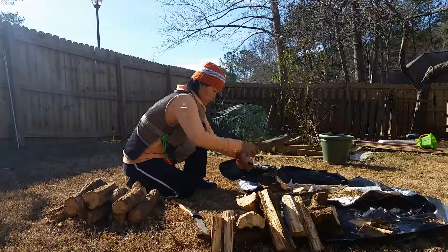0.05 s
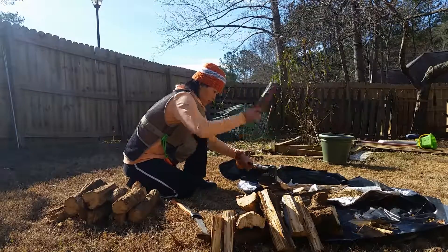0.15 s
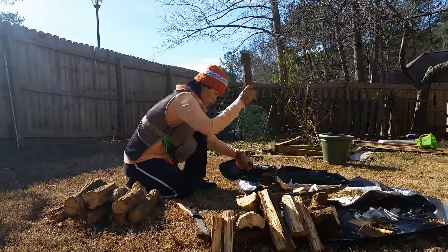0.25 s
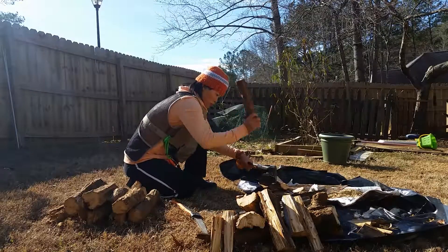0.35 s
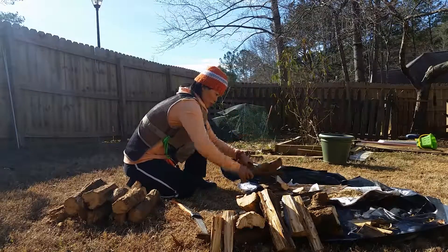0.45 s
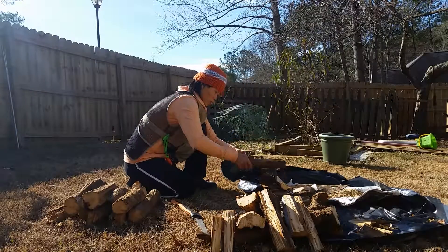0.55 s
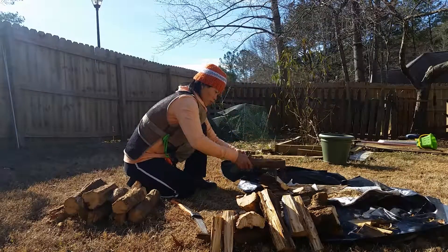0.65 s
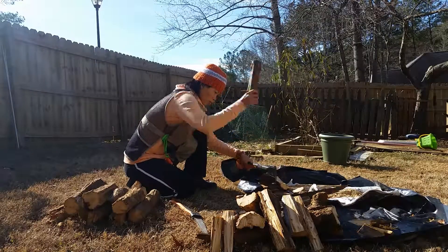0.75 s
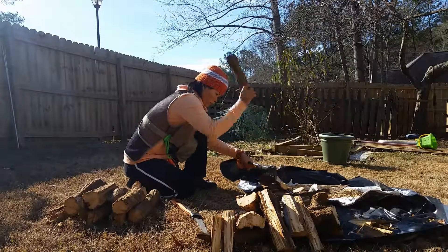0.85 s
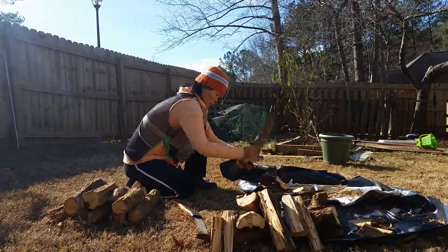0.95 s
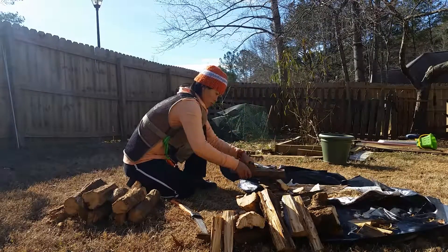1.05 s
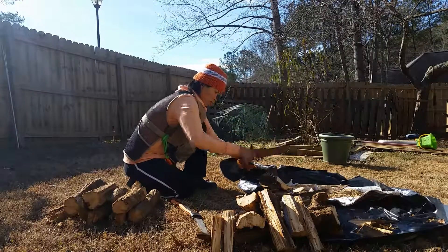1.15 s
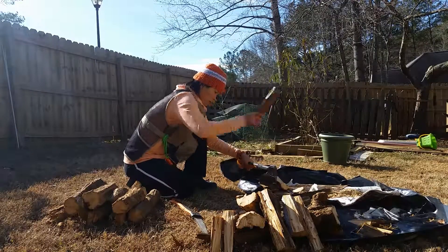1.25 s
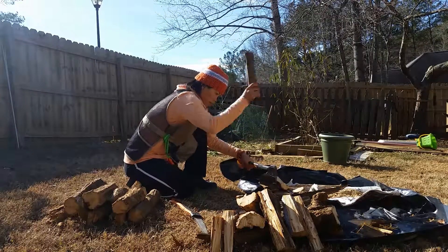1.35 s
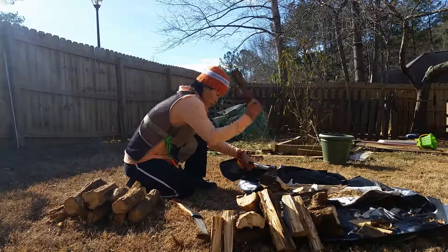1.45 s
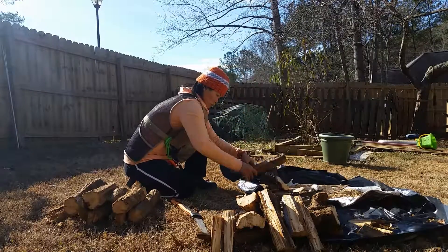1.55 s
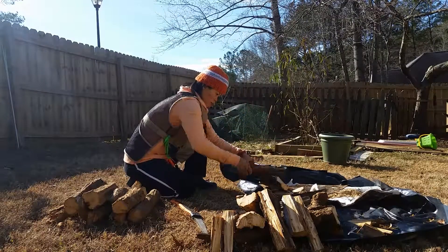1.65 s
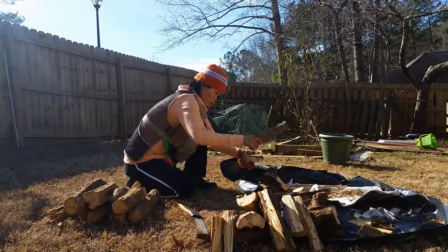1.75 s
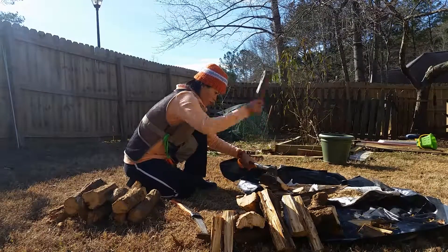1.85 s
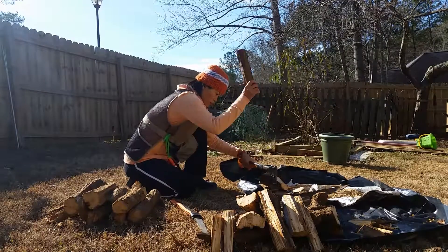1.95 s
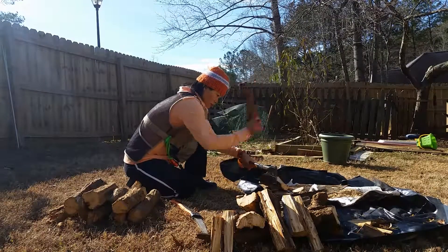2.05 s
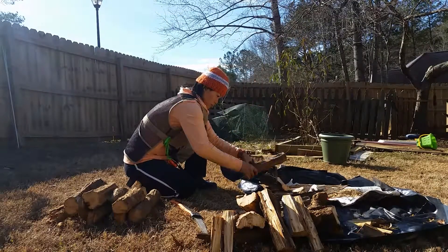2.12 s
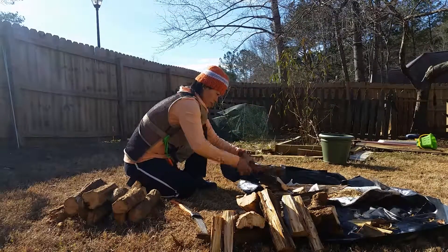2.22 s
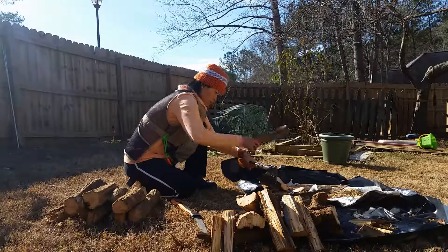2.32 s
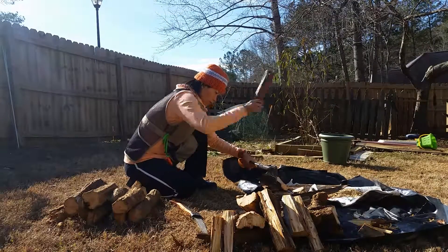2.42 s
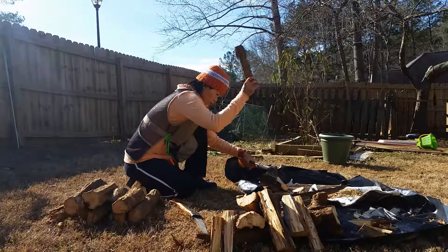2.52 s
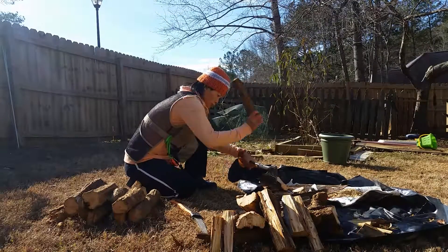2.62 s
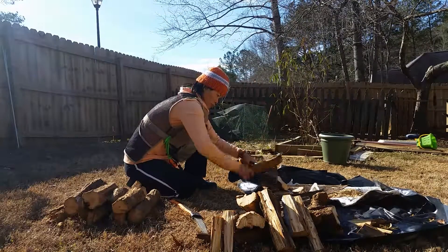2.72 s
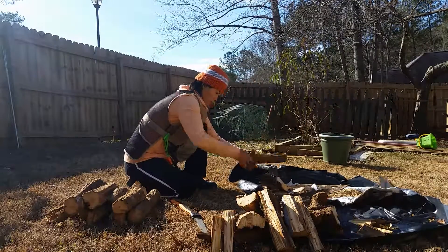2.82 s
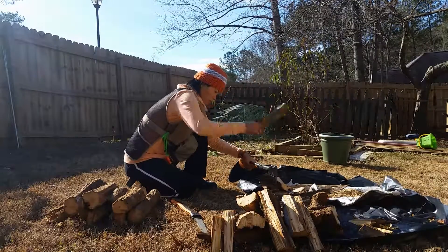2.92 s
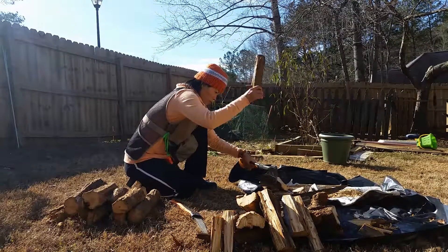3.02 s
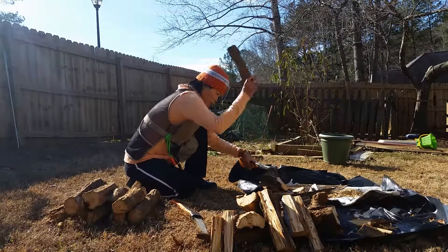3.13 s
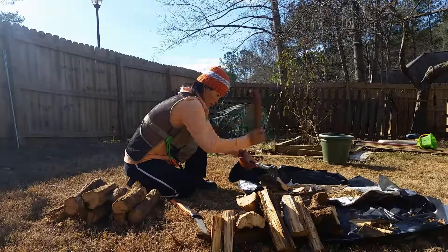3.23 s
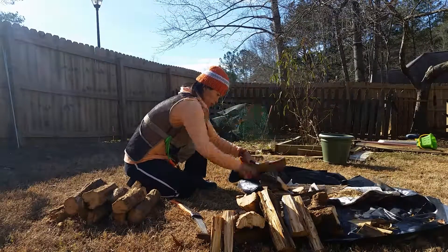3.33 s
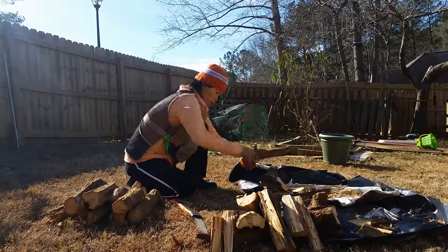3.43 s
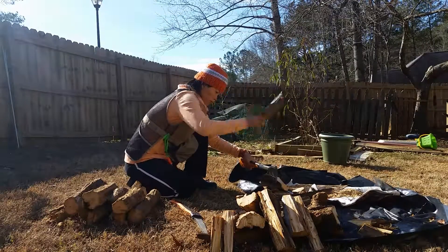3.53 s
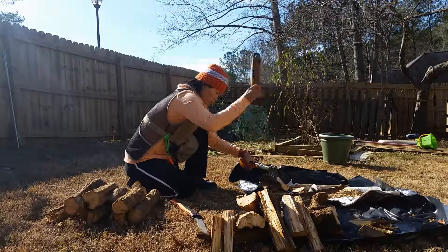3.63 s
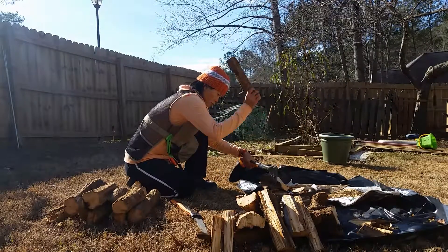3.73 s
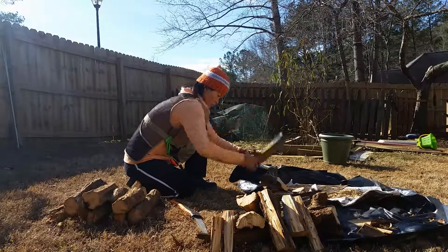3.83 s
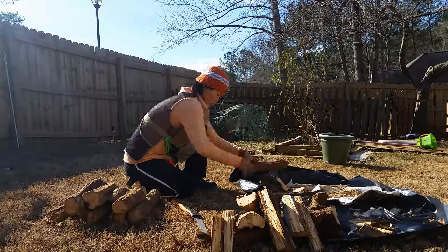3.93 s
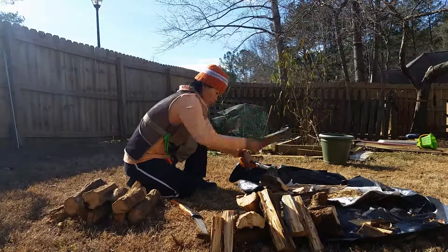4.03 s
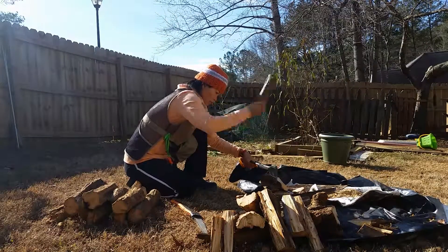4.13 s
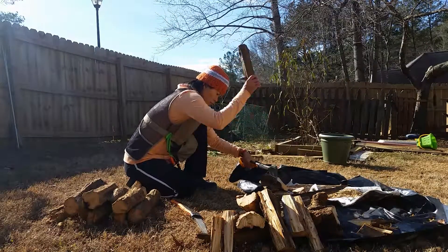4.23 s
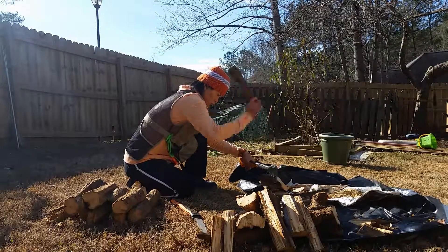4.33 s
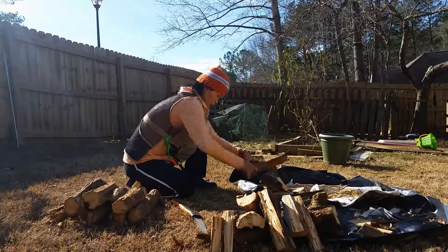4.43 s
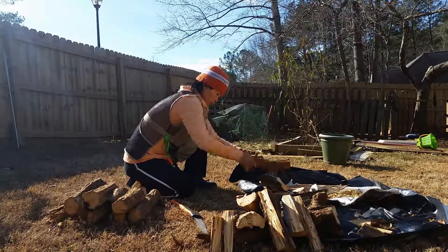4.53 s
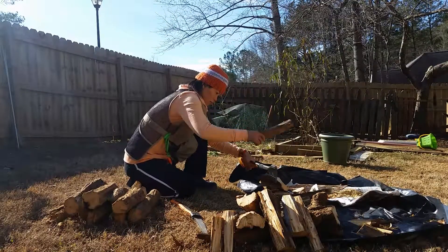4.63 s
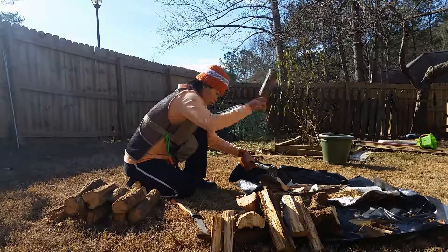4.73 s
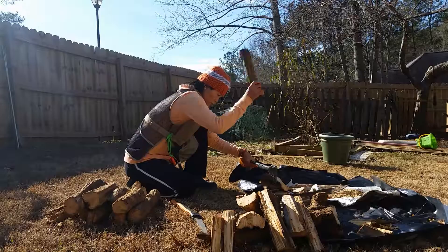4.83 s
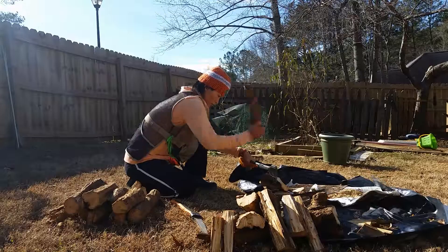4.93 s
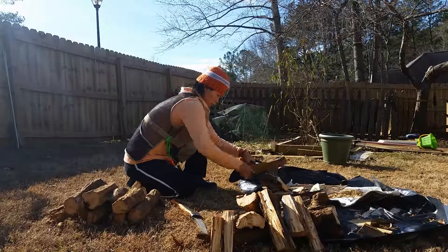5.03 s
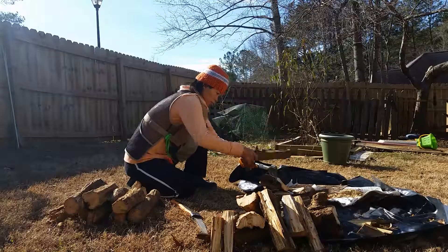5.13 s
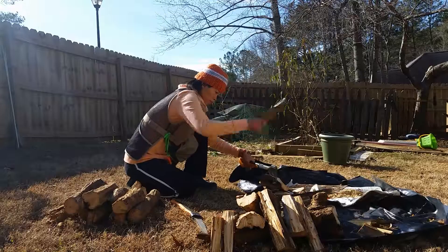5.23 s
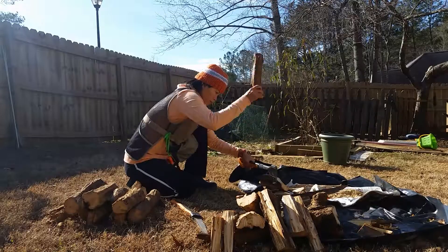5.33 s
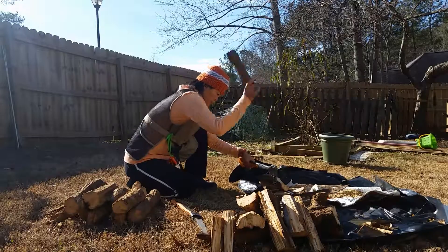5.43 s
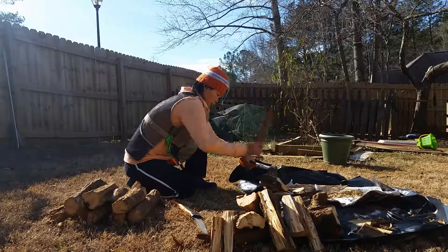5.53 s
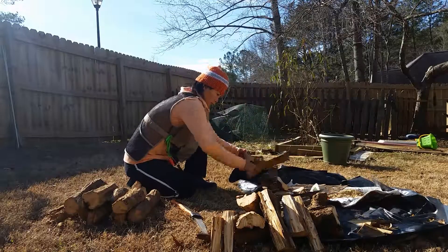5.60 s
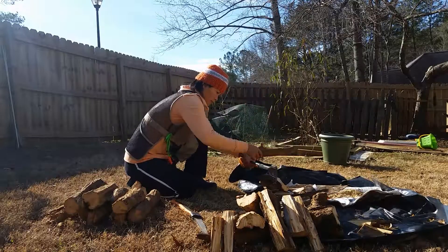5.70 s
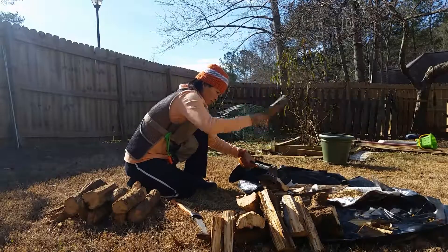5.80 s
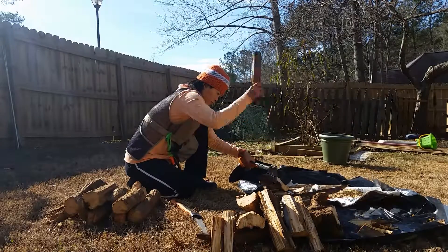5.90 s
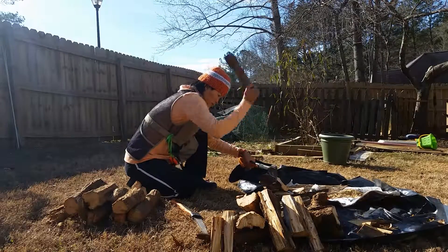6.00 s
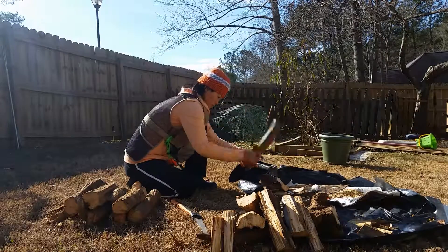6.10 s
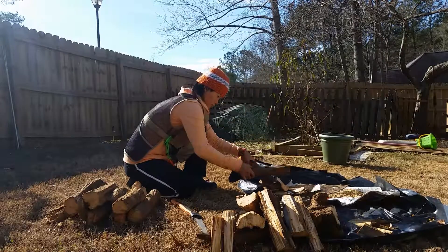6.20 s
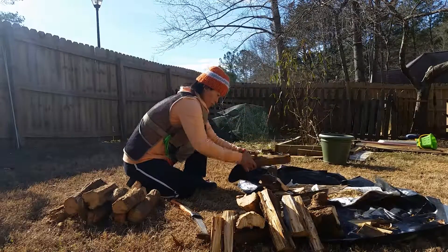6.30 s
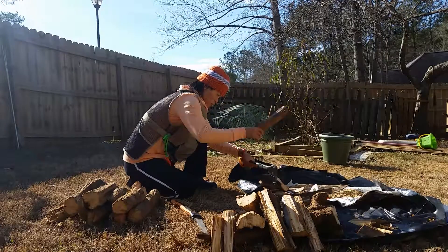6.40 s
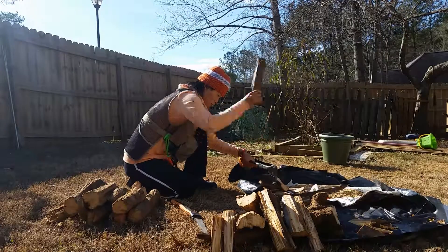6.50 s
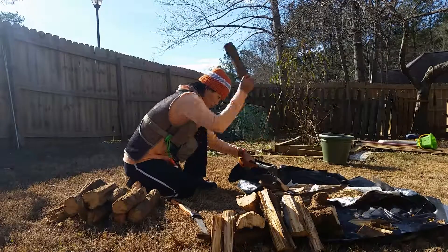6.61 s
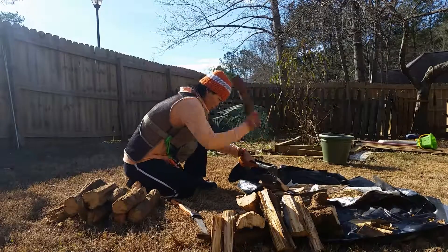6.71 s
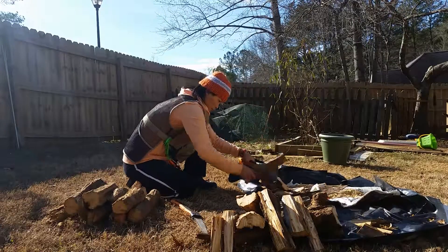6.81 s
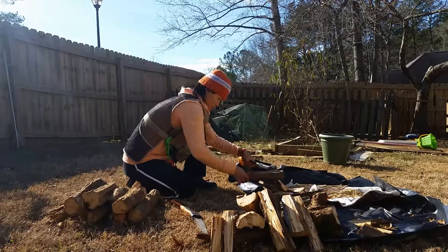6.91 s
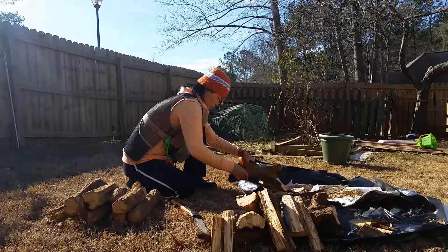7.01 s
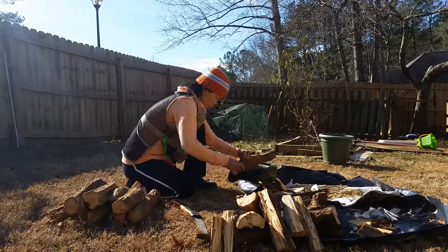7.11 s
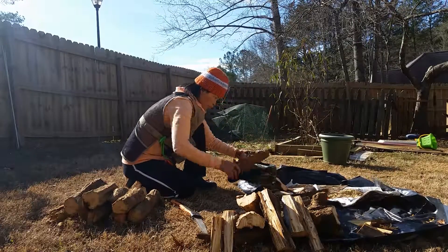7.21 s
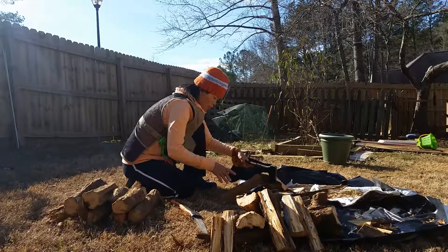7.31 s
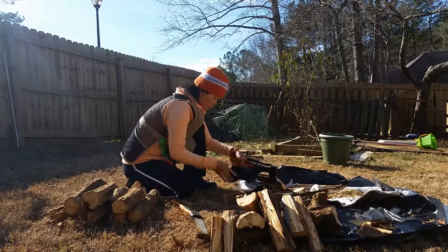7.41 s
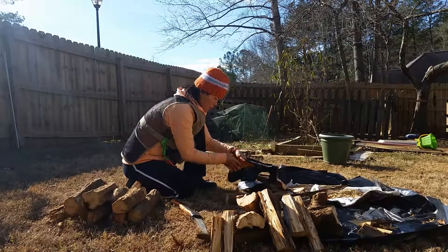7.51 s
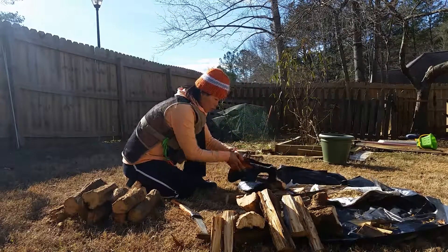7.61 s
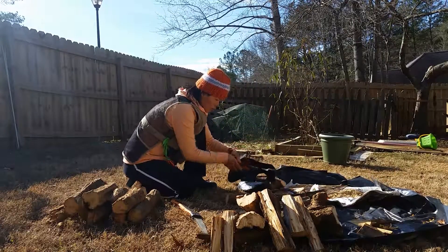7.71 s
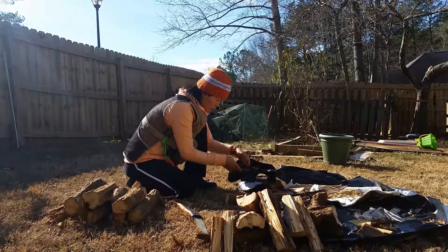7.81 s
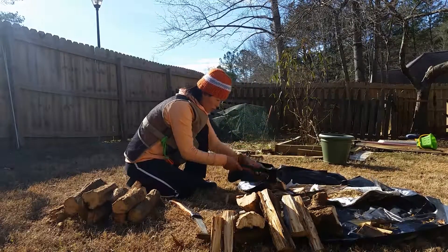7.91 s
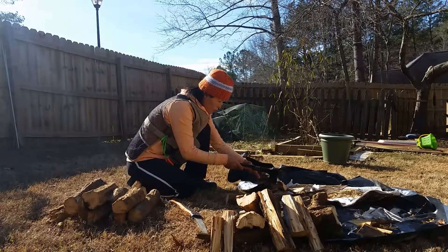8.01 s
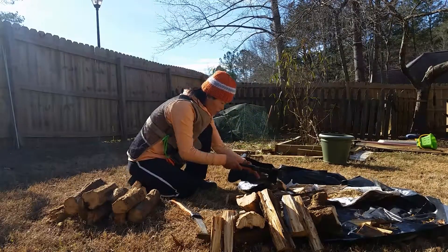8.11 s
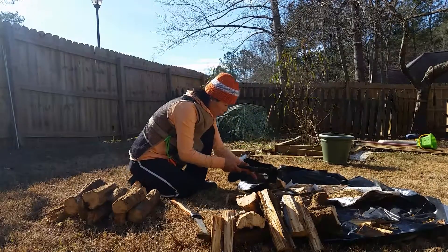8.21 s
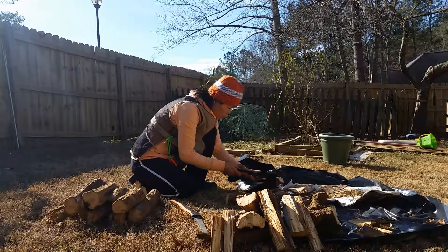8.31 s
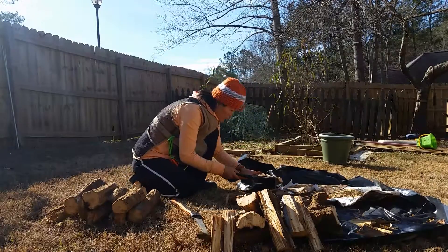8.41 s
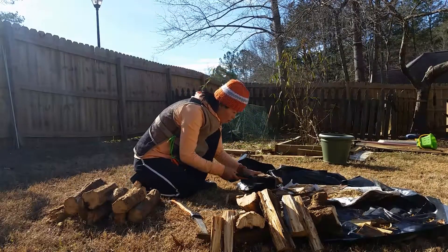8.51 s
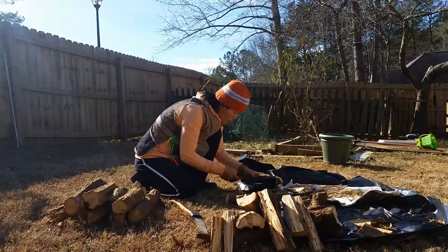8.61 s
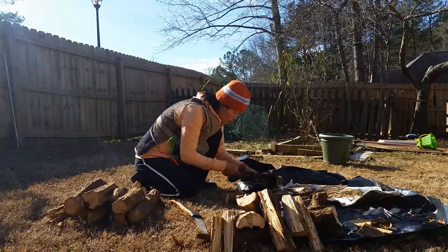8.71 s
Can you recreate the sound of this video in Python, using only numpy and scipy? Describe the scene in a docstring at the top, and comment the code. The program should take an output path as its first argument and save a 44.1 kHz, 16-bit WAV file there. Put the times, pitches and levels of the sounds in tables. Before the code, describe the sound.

Even, sharp knocks of a club driving a blade into wood echo briefly around a yard, then give way to light scrapes and bumps.

```python
"""A fenced back yard. Throughout: distant traffic rumbles and drones, light air stirs, the microphones
hiss, chiefly the left. From 0.3 s a wooden club drives a blade down a billet of resinous wood in
twelve even blows: club, blade and billet ring briefly, fibres crack, fence and house throw each knock
back. Between blows a bit of metal tinkles faintly; later a few chips tick. From 7 s the wood is
handled: scrapes and soft bumps."""
import sys
import numpy as np
from scipy import signal
from scipy.fft import rfft, irfft
from scipy.io import wavfile

SR = 44100
rng = np.random.default_rng(int(sys.argv[2]) if len(sys.argv) > 2 else 0)


def store_pcm(level_fs):
    """Save levels as 16-bit WAV."""
    pcm = np.round(np.clip(level_fs, -1, 1) * 32767).astype(np.int16)
    wavfile.write(sys.argv[1], SR, np.atleast_2d(pcm).T)


N = 385871

# traffic rumble, spectrum: f/Hz, density/dB
RUMBLE_SPECTRUM = [(20, -29), (40, -9), (70, 3), (120, 0.5), (170, -5.5), (250, -13.5), (400, -22),
                   (900, -77.5)]
# traffic rumble, envelope before trim: t/s, level/dB
RUMBLE_ENVELOPE = [(0.0, -44), (2.73, -42.5), (3.48, -45.5), (4.29, -42), (4.65, -48.5), (6.31, -44.5),
                   (6.48, -42.5), (6.75, -38.5), (8.75, -40.5)]
# road noise, spectrum: f/Hz, density/dB
ROAD_SPECTRUM = [(100, -0.5), (250, 1), (450, 3.5), (800, 0.5), (1300, -8), (2000, -19.5), (3000, -36.5),
                 (7000, -74)]
# common swell of road noise and hiss: t/s, level/dB
SWELL = [(0.0, -68), (0.87, -63), (2.48, -63), (2.82, -68.5), (4.46, -67.5), (4.92, -75.5), (5.75, -72),
         (6.11, -64), (6.46, -66.5), (7.45, -58.5), (8.75, -55)]
# far machines: start/s, length/s, attack/s, release/s, level/dB, first f/Hz, last f/Hz
DRONES = [(-.3, 1.04, .2, 0.58, -44.5, 130, 120.3), (.1, 1.36, 0.4, 0.29, -60, 350, 359),
          (1.2, 2.04, 0.78, .5, -57.5, 376.6, 382), (3.597, 3.1, 0.31, 0.97, -49, 104.6, 107.6),
          (6.15, 2.3, 0.41, 1.25, -37, 106.7, 106.6), (8.5, 0.55, .2, .2, -40.5, 112.1, 117.3)]
# left microphone hiss: f/Hz, density/dB
HISS_LEFT = [(2500, -36), (3200, -25.5), (3700, -7.5), (4400, 1.5), (5100, -10), (5800, -19), (6600, -47),
             (8500, -63), (10500, -31.5), (12500, -36.5), (15500, -30)]
# right microphone hiss, same scale: f/Hz, density/dB
HISS_RIGHT = [(2500, -34), (4000, -28.5), (5500, -38), (8000, -57), (11000, -37.5), (15500, -33)]
# air on the microphone ports: f/Hz, density/dB
BREEZE_SPECTRUM = [(15, 12), (35, -13.5), (70, -8), (200, -28), (600, -50)]
# club on blade: t/s, thud/dB, hardness/dB, splinter fizz/dB, send to yard scatter/dB
BLOWS = [(0.295, -18, 5, -15, -2.5), (0.8561, -18, 6.5, -10, -3.5), (1.4155, -18.5, 6, -8.5, -1.5),
         (1.991, -14.5, 1.5, -10.5, -3), (2.5626, -19, 3, -11.5, 3), (3.1427, -19, 0, -14.5, 0),
         (3.7097, -15.5, -2, -17.5, -3.5), (4.2828, -21, 1.5, -16.5, 3), (4.853, -20, -0.7, -17, -0.5),
         (5.4285, -17.5, -3, -22, -2), (5.9849, -22, 6.5, -10.5, -0.5), (6.6311, -16, 2.3, -8.5, -0.5)]
# joint modes of club, blade and billet: f/Hz, level/dB, t60/s
BODY_MODES = [(81.2, -2, 0.13), (127, 8.5, 0.025), (230.2, 9.5, 0.033), (345.6, -6, 0.088),
              (476.7, 0.5, 0.048), (561, -3.5, 0.048), (701, 4, 0.035), (844, -8.5, 0.1),
              (919, -7.5, 0.056), (1032, -8.5, 0.049), (1179, -16, 0.078), (1473, -19, 0.15),
              (1584, -2.5, 0.049), (1655, -1, 0.016), (1778, -19, 0.056), (2065, -28.5, .07),
              (2250, -30.5, 0.066)]
# mode response to contact hardness: f/Hz, slope/(dB/dB)
HARDNESS_SLOPE = [(220, 0), (460, 0), (670, 1.0), (950, 0.94), (1600, 1)]
# steel blade's own modes: f/Hz, level/dB, t60/s
BLADE_MODES = [(4045, -33.5, 0.04), (4840, -48, 0.006)]
# contact crack: f/Hz, density/dB
CRACK_SPECTRUM = [(300, 16.5), (700, 34), (1300, 23), (1800, 18), (2300, 12.5), (3000, -2), (3600, 12),
                  (4000, 12), (4400, 13), (4950, 13), (6000, -4), (8000, -17), (16000, -27.5)]
# tearing fibres: f/Hz, density/dB
FIZZ_SPECTRUM = [(3000, -24.5), (6500, -17), (8500, -16.5), (10000, 4.5), (11000, 8.5), (12500, -1.5),
                 (15500, 6)]
# reflections off ground, fence and house: delay/s, level/dB, cutoff/Hz
ECHOES = [(.00456, -6, 3000), (.0203, -8.5, 910), (.0413, -17.5, 14000), (.0486, -22, 1170),
          (.0726, -27.5, 700), (.082, -27.5, 490), (.0995, -20.5, 386)]
# scatter off boards and trees: f/Hz, gain/dB
SCATTER_SPECTRUM = [(60, -21), (220, -9), (500, -13), (700, -23.5), (840, -15.5), (1100, -15.5),
                    (1600, -11.5), (2000, -6), (2800, -6.5), (4000, -12.5), (8000, -3.5), (15000, -9.5)]
# small metal piece, tinkles: t/s, level/dB
TINKLES = [(.58, -69), (1.1534, -67), (1.9246, -63), (2.5026, -63.5), (2.686, -60), (3.4012, -67),
           (3.992, -65), (4.433, -65)]
# small metal piece, modes: f/Hz, level/dB, t60/s
TINKLE_MODES = [(9320, -7, 0.12), (10600, 1.5, 0.093)]
# soft bumps on wood and ground: t/s, level/dB, f/Hz, t60/s
BUMPS = [(3.759, -26, 48.4, 0.44), (7.89, -32, 300, 0.087), (7.95, -22.5, 71, .3),
         (8.011, -27.5, 384, 0.021), (8.246, -23.5, 476, 0.048)]
# chip and bark ticks: t/s, level/dB, t60/s
TICKS = [(3.828, -25, 0.015), (4.3908, -22, .015), (6.1165, -23, .02), (7.066, -35, .03), (7.25, -20, 0.13),
         (7.37, -32, .04), (7.439, -29, .035), (7.62, -32, .02), (8.188, -29, .05), (8.247, -27, .06)]
# chip and bark spectrum: f/Hz, density/dB
TICK_SPECTRUM = [(400, -4), (1300, 1), (2400, 0.5), (3200, -7.5), (4500, -1), (7500, -23.5), (10500, 0),
                 (15500, -16.5)]
# shading of the right microphone, facing away from the work: f/Hz, gain re left/dB
RIGHT_SHADING = [(60, -2), (200, -2), (470, -3), (700, -5), (1600, -11), (3000, -12), (4300, -22.5),
                 (7000, -26), (10000, -20.5), (13000, -3.5), (15500, -1.5)]


def from_db(db):
    """Decibels to gain."""
    return 10 ** (np.asarray(db) / 20)


def unit_rms(x):
    """Scale to unit power."""
    return x / np.sqrt(np.mean(x ** 2) + 1e-20)


def envelope(points):
    """Breakpoints interpolated to every sample."""
    return np.interp(np.arange(N) / SR, *np.transpose(points))


def time_axis(length_s):
    """Sample times in s."""
    return np.arange(int(length_s * SR)) / SR


def add(out, at_s, sound):
    """Mix in place."""
    start = int(round(at_s * SR))
    out[start:start + len(sound)] += sound[:len(out) - start]


def colour(x, spectrum, size=8192):
    """Minimum-phase filter from (f/Hz, gain/dB) points."""
    hz, db = np.transpose(spectrum)
    grid_hz = np.maximum(np.arange(size // 2 + 1) * SR / size, 1)
    magnitude = from_db(np.interp(np.log(grid_hz), np.log(hz), db))
    cepstrum = irfft(np.log(magnitude))
    causal = np.r_[cepstrum[0], 2 * cepstrum[1:size // 2]]
    response = irfft(np.exp(rfft(causal, size)))
    return signal.fftconvolve(x, response[:size // 2])[:len(x)]


def noise(spectrum, run_in=4096):
    """Steady coloured noise."""
    return colour(rng.standard_normal(N + run_in), spectrum)[run_in:]


def stereo_noise(spectrum, width):
    """Mid/side noise at unit power; width is the side gain."""
    sides = np.array([[1], [-1]])
    return unit_rms(noise(spectrum) + width * sides * noise(spectrum))


def drift(rate_hz):
    """Slow wander between unit-variance random knots."""
    knots = rng.standard_normal(1000)
    return np.interp(np.arange(N) / SR * rate_hz, np.arange(len(knots)), knots)


def decay(t, t60_s):
    """Exponential decay."""
    return np.exp(-np.log(1000) * t / t60_s)


def ring(t, hz, t60_s):
    """One struck mode."""
    return np.sin(2 * np.pi * hz * t) * decay(t, t60_s)


def burst(t, t60_s, grain_db):
    """Decaying shower of uneven micro-clicks, unit energy."""
    clicks = rng.standard_normal(len(t)) * from_db(grain_db * rng.standard_normal(len(t)))
    clicks *= decay(t, t60_s)
    return clicks / np.sqrt(np.sum(clicks ** 2))


def rumble(trim_db=1):
    """Low end of distant traffic, nearly alike on both sides."""
    return from_db(envelope(RUMBLE_ENVELOPE) + trim_db) * stereo_noise(RUMBLE_SPECTRUM, width=0.17)


def road(swell_db, base_db=-56.5, swell_share=0.87):
    """Wide road noise, following most of the swell."""
    return from_db(base_db + swell_share * swell_db) * stereo_noise(ROAD_SPECTRUM, width=0.73)


def drones(waver_db=3.0, waver_hz=2.54):
    """Far machines: one gliding tone each, wavering on its way through the air."""
    out = np.zeros(N)
    for start_s, length_s, attack_s, release_s, db, first_hz, last_hz in DRONES:
        t = np.arange(N) / SR - start_s
        hz = np.interp(t, [0, length_s], [first_hz, last_hz]) + waver_hz * drift(rate_hz=12)
        fade = np.clip(np.minimum(t / attack_s, (length_s - t) / release_s), 0, 1)
        rms = from_db(db + waver_db * drift(rate_hz=8.3)) * fade
        out += np.sqrt(2) * rms * np.sin(2 * np.pi * np.cumsum(hz) / SR)
    return out


def hiss(swell_db, base_db=-62):
    """Each microphone's own noise, following the full swell."""
    return from_db(base_db + swell_db) * unit_rms(np.array([noise(HISS_LEFT), noise(HISS_RIGHT)]))


def breeze(level_db=-60):
    """Light air on the ports, independent per channel."""
    return from_db(level_db) * unit_rms(np.array([noise(BREEZE_SPECTRUM), noise(BREEZE_SPECTRUM)]))


def body_ring(t, thud_db, hard_db, spread_db=1.0, detune=0.009):
    """Club, blade and billet ring together; harder contact feeds the upper modes."""
    hz, mode_db, t60_s = np.transpose(BODY_MODES)
    slope = np.interp(hz, *np.transpose(HARDNESS_SLOPE))
    signs = -(-1) ** np.arange(len(hz))   # adjacent modes in antiphase
    level_jitter, pitch_jitter = rng.standard_normal((2, len(hz)))
    gains = signs * from_db(thud_db + mode_db + slope * hard_db + spread_db * level_jitter)
    detuned_hz = hz * (1 + detune * pitch_jitter)
    return gains @ ring(t, detuned_hz[:, None], t60_s[:, None])


def knock(thud_db, hard_db, fizz_db, typical_db=-16, crack_slope=1.1, clink_slope=2.4):
    """One blow: body ring, fibres tearing, and a clink and crack that grow with thud plus hardness."""
    t = time_axis(0.6)
    body = body_ring(t, thud_db, hard_db)
    drive_db = crack_slope * (thud_db + hard_db - typical_db) - 1.2
    clink = sum(from_db(db + clink_slope * drive_db) * ring(t, hz, t60_s)
                for hz, db, t60_s in BLADE_MODES)
    crack = from_db(drive_db - 14.5) * colour(burst(t, t60_s=0.039, grain_db=0), CRACK_SPECTRUM)
    tear = burst(t, t60_s=0.065, grain_db=0.5)
    snap = from_db(-2) * burst(t, t60_s=0.002, grain_db=-2.5)
    fizz = from_db(fizz_db - 7.5) * colour(tear + snap, FIZZ_SPECTRUM)
    return body + clink + crack + fizz


def echoes(x, lag_s):
    """Direct sound plus low-passed reflections; lag_s delays the reflections only."""
    out = x.copy()
    for delay_s, db, cutoff_hz in ECHOES:
        lowpass = signal.butter(1, cutoff_hz, fs=SR)
        add(out, delay_s + lag_s, from_db(db) * signal.lfilter(*lowpass, x))
    return out


def scatter(x, woodpile_s=0.012, fence_s=0.0405):
    """Diffuse returns: woodpile first, then fence boards with a faint tail from the trees."""
    t = np.arange(len(x)) / SR
    woodpile = from_db(-4) * burst(t, t60_s=0.13, grain_db=7)
    fence = burst(t, t60_s=0.28, grain_db=6)
    trees = from_db(-17) * burst(t, t60_s=1.0, grain_db=7.5)
    response = np.zeros(len(t))
    add(response, woodpile_s, woodpile)
    add(response, fence_s, fence + trees)
    return signal.fftconvolve(x, colour(response, SCATTER_SPECTRUM))[:len(x)]


def blows(shared_scatter_db=-2, right_scatter_db=3):
    """Knocks returned by the yard; scatter is part shared, part per microphone."""
    left, right = np.zeros((2, N))
    for at_s, thud_db, hard_db, fizz_db, send_db in BLOWS:
        direct = knock(thud_db, hard_db, fizz_db)
        sent = from_db(send_db) * direct
        shared = from_db(shared_scatter_db) * scatter(sent)
        left_own = scatter(sent)
        right_own = from_db(right_scatter_db) * scatter(sent)
        add(left, at_s, echoes(direct, lag_s=0) + shared + left_own)
        add(right, at_s, echoes(direct, lag_s=0.00037) + shared + right_own)
    return np.array([left, right])


def tinkles():
    """A small metal piece rings with the swing."""
    out, t = np.zeros(N), time_axis(0.4)
    tinkle = sum(from_db(db) * ring(t, hz, t60_s) for hz, db, t60_s in TINKLE_MODES)
    for at_s, db in TINKLES:
        add(out, at_s, from_db(db) * tinkle)
    return out


def bumps():
    """Wood and ground bumped: one mode each, slow onset from the soft contact."""
    out, t = np.zeros(N), time_axis(0.4)
    for at_s, db, hz, t60_s in BUMPS:
        onset = 1 - decay(t, t60_s / 2)
        add(out, at_s, from_db(db) * ring(t, hz, t60_s) * onset)
    return out


def ticks():
    """Chips and bark tick and scrape: micro-clicks swelling in."""
    out, t = np.zeros(N), time_axis(0.4)
    for at_s, db, t60_s in TICKS:
        scrape = colour(burst(t, t60_s, grain_db=4.5), TICK_SPECTRUM)
        onset = 2 * (1 - decay(t, t60_s))
        add(out, at_s, from_db(db) * scrape * onset)
    return out


def scene(swell_ref_db=-65):
    """Traffic and woodwork at two microphones, the right one shaded."""
    swell_db = envelope(SWELL) - swell_ref_db
    traffic = rumble() + road(swell_db)
    mic_hiss = hiss(swell_db)
    left, right = traffic + drones() + blows() + tinkles() + bumps() + ticks()
    return np.array([left, colour(right, RIGHT_SHADING)]) + mic_hiss + breeze()


def record(dry, cutoff_hz=15600):
    """Steep elliptic low-pass."""
    return signal.sosfilt(signal.ellip(10, 0.2, 80, cutoff_hz, fs=SR, output="sos"), dry)


dry = scene()
out = record(dry)
store_pcm(out)
```